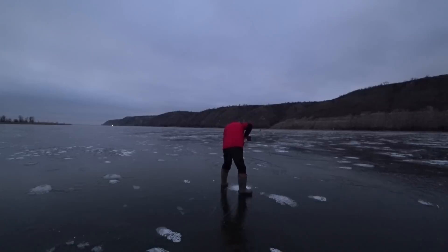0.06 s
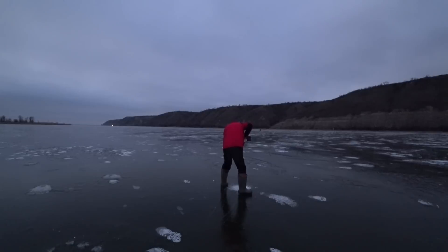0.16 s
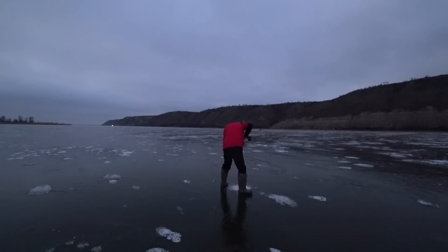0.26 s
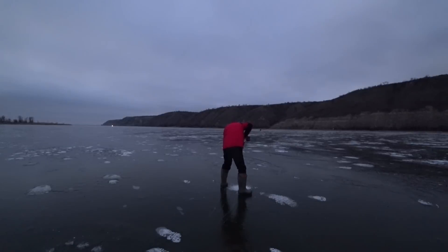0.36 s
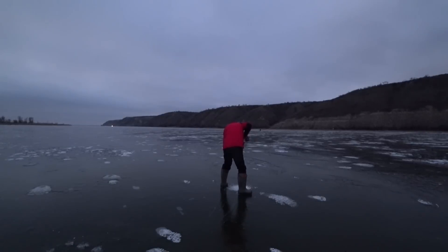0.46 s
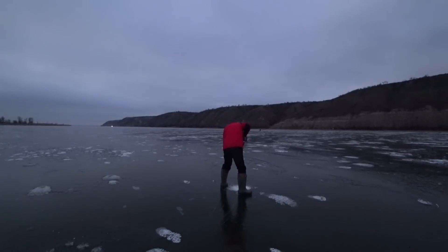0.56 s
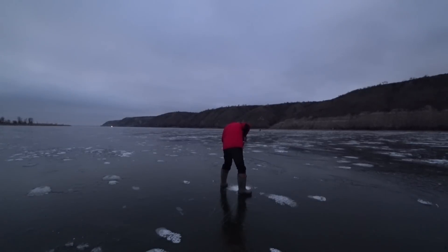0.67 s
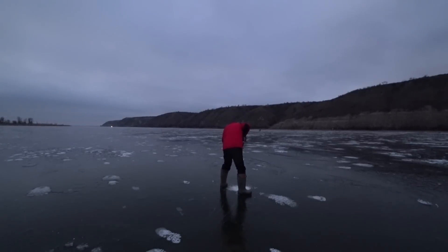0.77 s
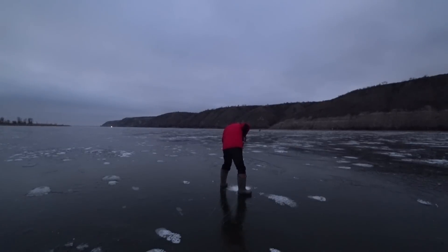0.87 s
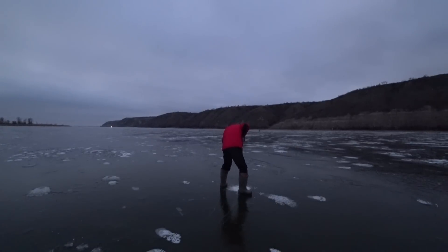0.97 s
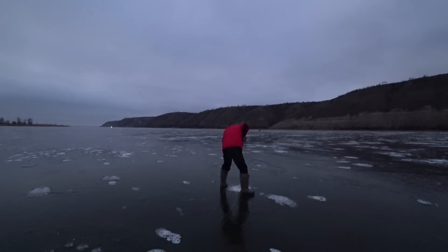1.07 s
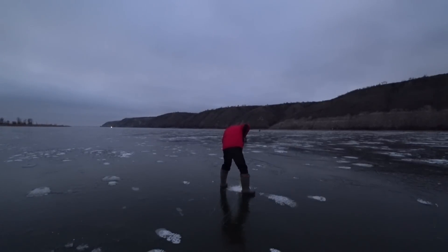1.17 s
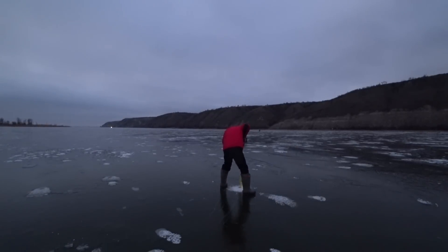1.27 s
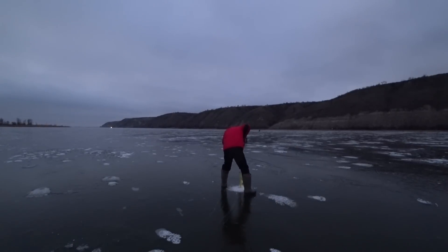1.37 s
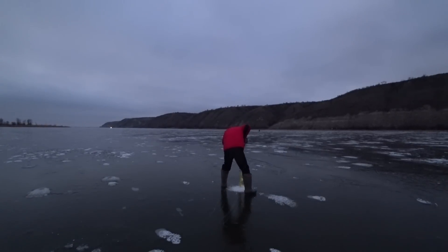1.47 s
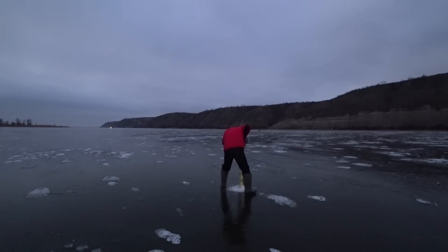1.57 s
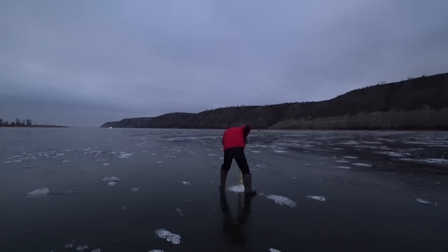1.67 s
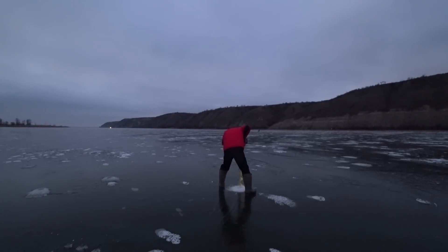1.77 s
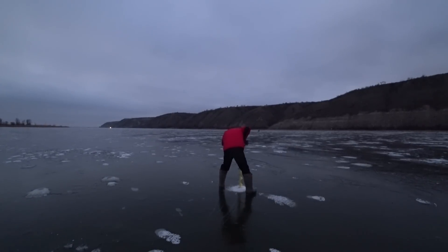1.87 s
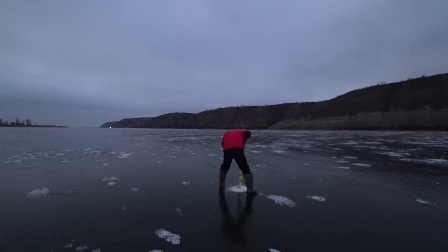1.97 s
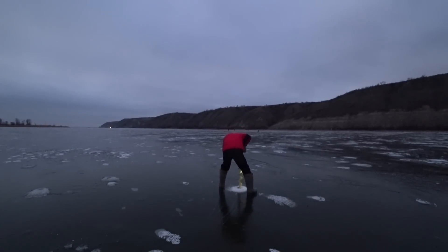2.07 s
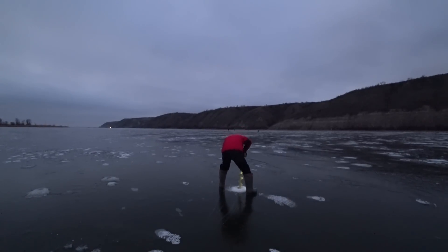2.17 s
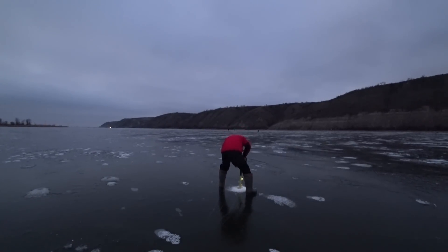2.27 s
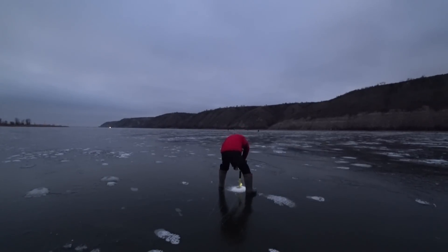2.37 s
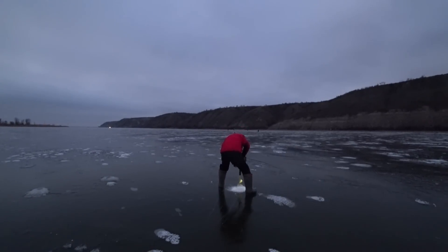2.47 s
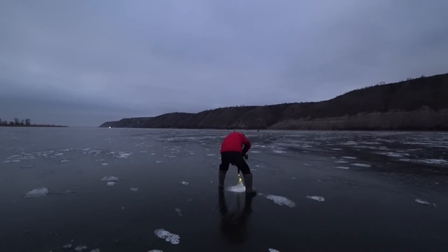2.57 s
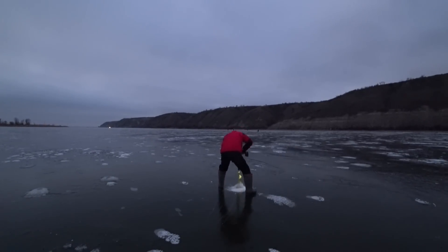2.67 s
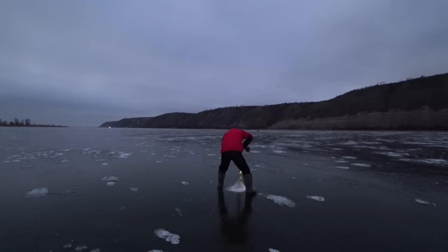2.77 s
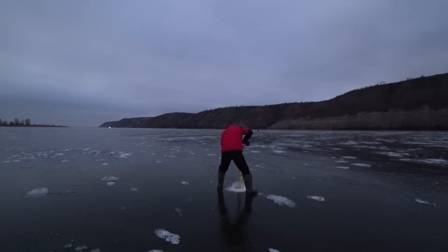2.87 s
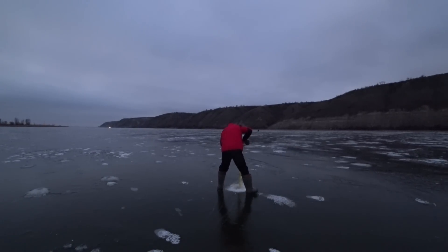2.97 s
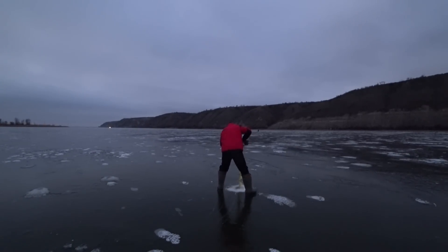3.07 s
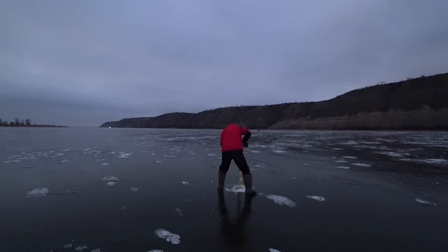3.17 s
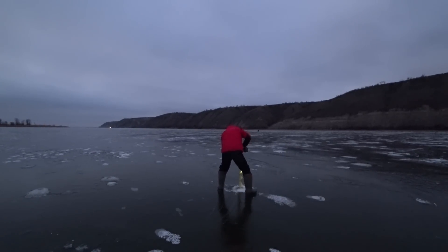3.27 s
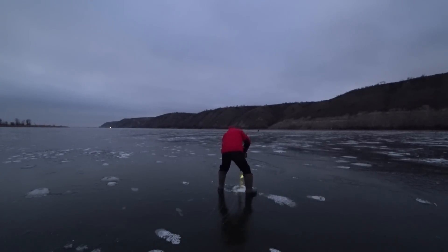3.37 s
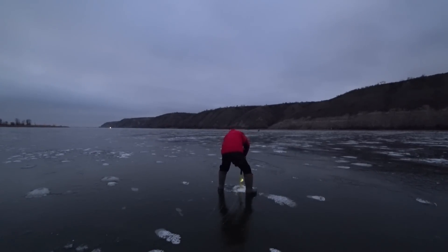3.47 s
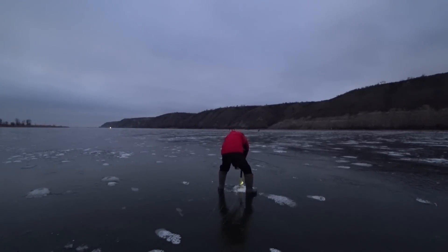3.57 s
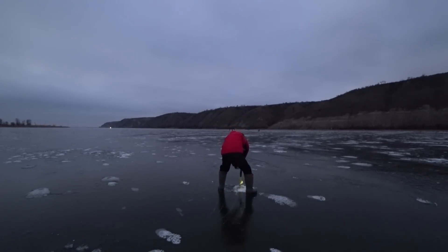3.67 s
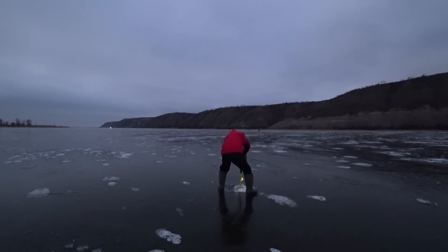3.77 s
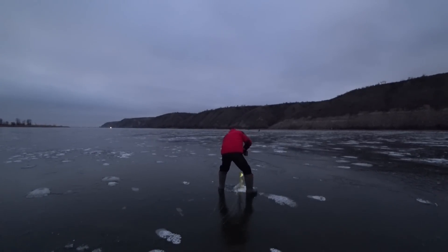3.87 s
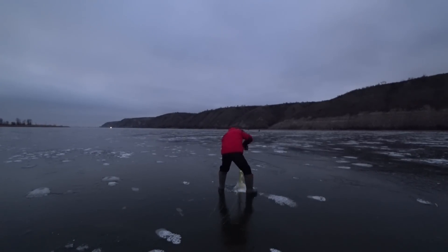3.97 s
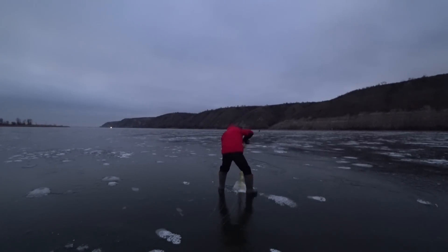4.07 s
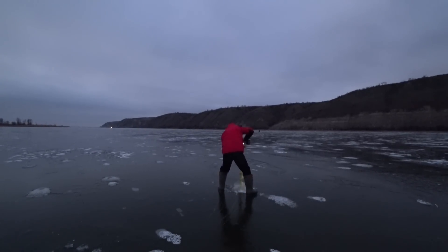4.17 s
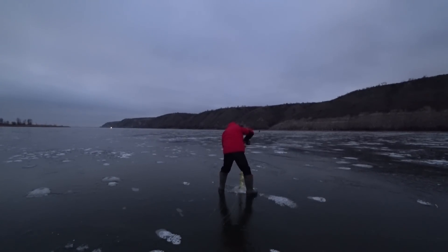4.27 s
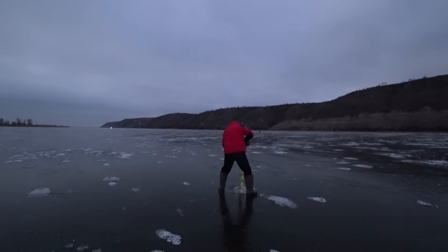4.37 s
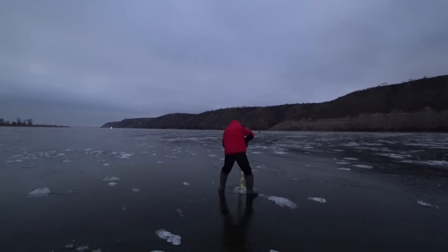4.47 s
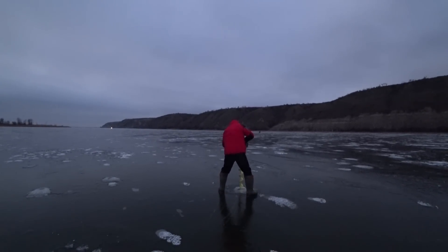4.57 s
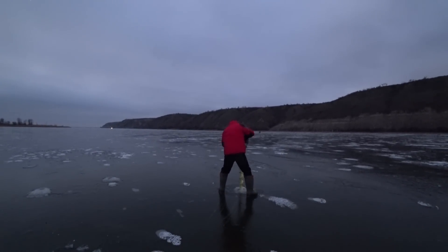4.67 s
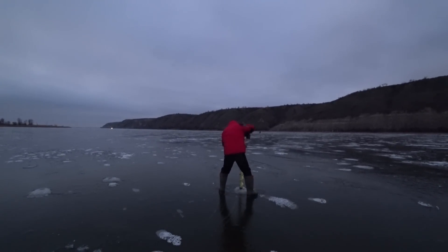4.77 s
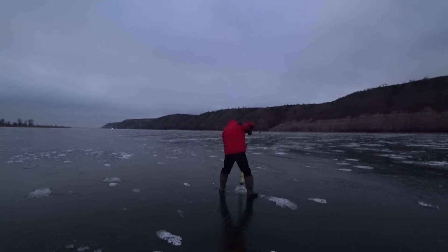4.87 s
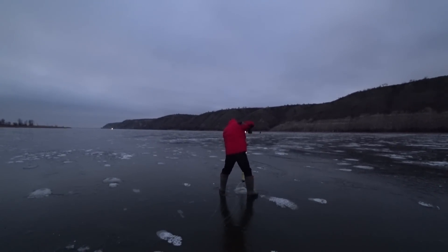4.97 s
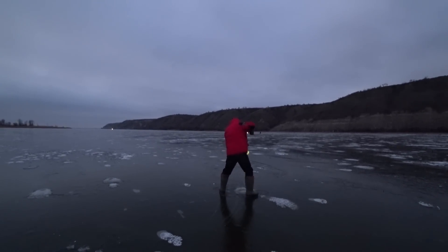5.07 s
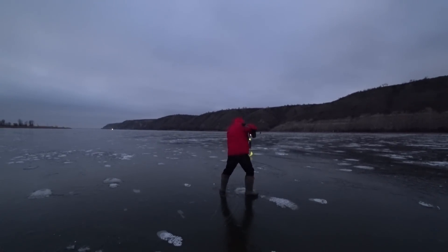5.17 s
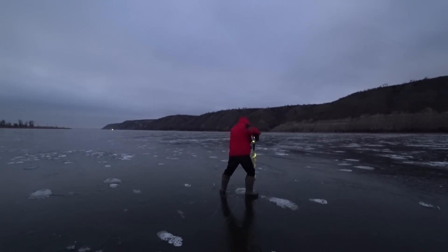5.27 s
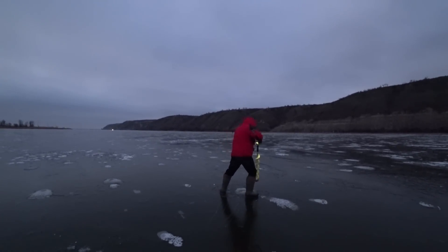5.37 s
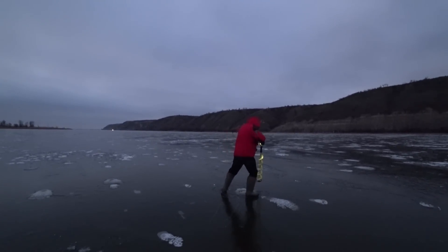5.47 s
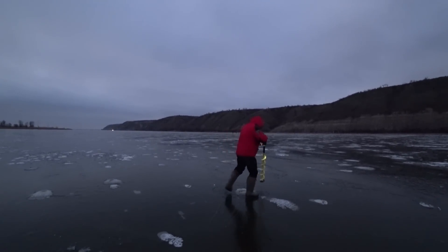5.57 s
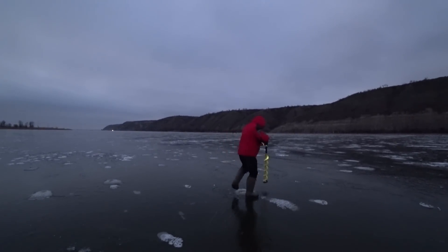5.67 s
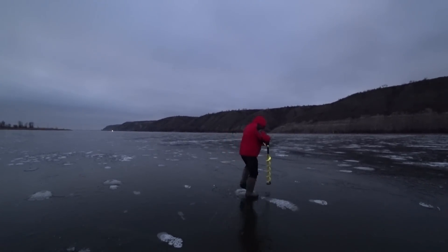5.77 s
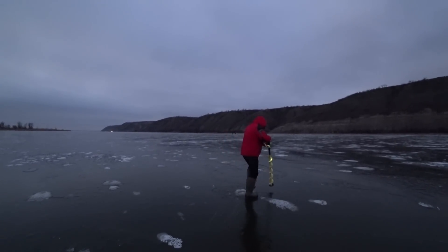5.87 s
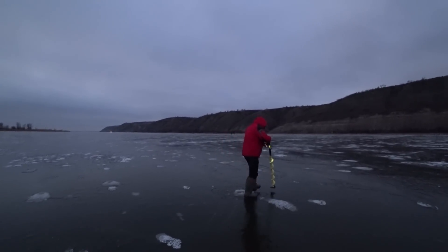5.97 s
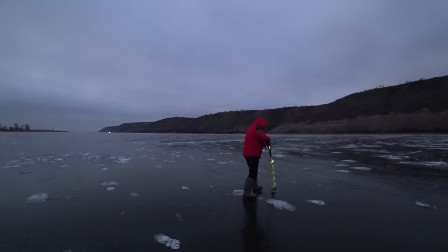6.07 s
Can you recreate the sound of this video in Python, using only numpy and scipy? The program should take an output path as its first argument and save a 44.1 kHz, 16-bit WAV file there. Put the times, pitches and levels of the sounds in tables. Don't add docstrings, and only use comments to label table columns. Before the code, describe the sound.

Outdoors on a frozen river, steel blades shave ice with a singing rasp, break into loud crunches and hollow knocks, then quiet to small wet ticks.

```python
import sys
import numpy as np
from scipy import signal
from scipy.fft import rfft, irfft, next_fast_len
from scipy.io import wavfile
from scipy.ndimage import uniform_filter1d

SR = 44100
rng = np.random.default_rng(int(sys.argv[2]) if len(sys.argv) > 2 else 0)


def how_loud(loudness_db):
    steps = np.asarray(loudness_db, float) / 20
    return 10 ** steps


def master_out(mix):
    frames = np.transpose(np.atleast_2d(mix))
    ceiling = np.clip(frames, -1, 1)
    pcm = np.round(ceiling * 32767).astype(np.int16)
    wavfile.write(sys.argv[1], SR, pcm)


N = 270323

# pitch_hz, level_db [dB per Hz]
SPLINTER_SPECTRUM = [(4120, -6), (7000, -5), (7770, -3.5), (9260, -10.5), (11200, -9.5), (13900, -19),
                     (16000, -26)]


def evened(x):
    return x / np.sqrt(np.mean(x ** 2) + 1e-20)


def read(points, hz):
    point_hz, value = np.transpose(points)
    return np.interp(np.log(hz + 1), np.log(point_hz + 1), value)


def shaped(x, points):
    size = next_fast_len(N)
    gain = how_loud(read(points, np.fft.rfftfreq(size, 1 / SR)))
    return irfft(rfft(x, size) * gain, size)[:N]


def colour(x, points):
    below, above = (points[0][0] * .8, -70), (points[-1][0] * 1.2, -70)
    return evened(shaped(x, [below, *points, above]))


def add(mix, start_s, sound):
    part = mix[round(start_s * SR):][:len(sound)]
    part += sound[:len(part)]


def resonate(x, hz, width_hz):
    turn = np.exp(2j * np.pi * np.cumsum(hz * np.ones(len(x))) / SR)
    decay = np.exp(-np.pi * width_hz / SR)
    smooth = signal.lfilter([1 - decay], [1, -decay], x / turn + 1e-18)
    return 2 * (turn * smooth).real


def grit(per_s, spread_db, flutter_db):
    size = how_loud(spread_db * np.minimum(rng.exponential(1, N), 4)) * rng.choice([-1., 1.], N)
    flutter = uniform_filter1d(rng.standard_normal(N), size=90)
    flutter = evened(signal.lfilter([1], [1, -.994], flutter))
    cracks = rng.random(N) < per_s / SR
    return evened(size * cracks * how_loud(flutter_db * flutter))


def wander(per_s):
    steps = rng.standard_normal(int(N / SR * per_s) + 2)
    return evened(np.interp(np.arange(N) * per_s / SR, np.arange(len(steps)), steps))


def patchy(x, patch_db):
    z = signal.stft(x, nperseg=256)[2]
    patches = uniform_filter1d(rng.standard_normal(z.shape), size=4, axis=0)
    patches = evened(uniform_filter1d(patches, size=9, axis=1))
    return evened(signal.istft(z * how_loud(patch_db * patches), nperseg=256)[1][:N])


def hush():
    # pitch_hz, level_db [dB per Hz]
    hush_spectrum = [(15, -55), (25, -25), (134, -2), (277, 5), (489, 4.5), (754, 2), (988, 8), (2220, -1),
                     (2910, -6), (3250, -9), (6920, -1.5), (9320, -17), (12200, -13.5), (14800, -21),
                     (16000, -13)]
    # pitch_hz, likeness [-1 to 1]
    likeness = [(60, 1), (300, 0.86), (1650, 0.029), (5000, 0.12), (15000, 0.51)]
    frames, hz = N // 256 + 5, np.fft.rfftfreq(1024, 1 / SR)
    a, b, c, d, patches = rng.standard_normal((frames, 513, 5)).T
    patches = uniform_filter1d(patches, size=12, axis=0)
    patches = 1.5 * evened(uniform_filter1d(patches, size=14, axis=1))
    same = np.clip(read(likeness, hz), -1, 1)[:, None]
    left = a + 1j * b
    right = same * left + np.sqrt(1 - same ** 2) * (c + 1j * d)
    z = np.array([left, right]) * how_loud(read(hush_spectrum, hz)[:, None] + patches)
    return how_loud(-54.5) * evened(signal.istft(z, nperseg=1024, noverlap=768)[1][:, :N])


def whine():
    # pitch_hz, level_db
    tones = [(9920, -82), (12350, -85)]
    out = np.zeros(N)
    for hz, db in tones:
        out += how_loud(db) * evened(resonate(resonate(rng.standard_normal(N), hz, 90), hz, 90))
    return out


def rubbing(t):
    # start_s, end_s, shaving_db, hole_ring_db, fizz_db
    strokes = [(.0, 0.027, -32, -57, -35), (0.036, 0.064, -23.5, -42, -40.5), (0.221, .26, -46, -43, -70),
               (0.27, 0.418, -29, -39.5, -45), (0.43, 0.47, -35.5, -39, -50),
               (0.485, 0.644, -46.5, -44.5, -72), (.65, 0.916, -51, -59, -78),
               (0.712, 0.836, -43.5, -61, -77), (1.068, 1.095, -31, -44, -42),
               (1.103, 1.822, -23, -41, -39), (1.83, 1.976, -22.5, -41.5, -35.5),
               (2.01, 2.058, -35.5, -47.5, -48), (2.06, 2.46, -43, -55.5, -50),
               (2.508, 2.846, -42.5, -44, -47), (2.888, 2.994, -32, -35, -56), (3, 3.179, -35.5, -49, -48),
               (3.211, 3.4, -40, -46.5, -52), (3.41, 3.556, -42.5, -44, -66),
               (3.57, 3.646, -36.5, -47.5, -47), (3.668, 3.84, -45, -48.5, -51),
               (3.835, 4.07, -39, -39.5, -50), (4.1, 4.404, -40.5, -55, -52),
               (4.431, 4.491, -42.5, -50.5, -60), (4.672, 4.829, -38.5, -38.5, -55)]
    # time_s, level_db
    slush = [
        (0, -58),
        (4.8, -53),
        (5.2, -53),
        (5.35, -58.5),
        (6.13, -68),
    ]
    rise_db_per_s, fall_db_per_s = 605, 545
    slush_layers_db = np.array([[0], [-8], [-8]])
    power = how_loud(np.interp(t, *np.transpose(slush)) + slush_layers_db) ** 2
    for start, end, *layers_db in strokes:
        near = slice(max(round((start - .1) * SR), 0), round((end + .1) * SR))
        rise_db = rise_db_per_s * (t[near] - start)
        fall_db = fall_db_per_s * (end - t[near])
        edge_db = np.minimum(0, np.minimum(rise_db, fall_db))
        stroke = how_loud(edge_db + np.array(layers_db)[:, None]) ** 2
        power[:, near] = np.maximum(power[:, near], stroke)
    return np.sqrt(power)


def shaving():
    # pitch_hz, width_hz, level_db
    shaft_modes = [(900, 90, 2), (2020, 60, -5), (2320, 70, -6), (5520, 120, -7)]
    # pitch_hz, swing_hz with each bite, sag [Hz per s], width_hz, level_db
    loaded_modes = [(1580, 20, -90, 45, 0), (2930, -60, -100, 90, 0), (4200, 50, 0, 90, -9),
                    (3260, 100, 0, 30, 1), (2450, 60, -150, 45, -2), (3650, -80, -120, 45, -3),
                    (5750, 90, 100, 120, -6)]
    # time_s, pitch_hz, level_db
    song = [(1.2, 4800, -8), (1.32, 4520, 5), (1.37, 4560, 5), (1.43, 4780, 4), (1.56, 4620, 2),
            (1.64, 4900, -7), (1.74, 4780, 1), (1.84, 4560, 0), (1.95, 4500, -10)]
    # pitch_hz, level_db [dB per Hz]
    ice_spectrum = [(440, -34), (750, -75), (904, 1.5), (1270, 2), (1600, 0), (2930, -1.5), (3530, -2),
                    (5700, -3), (9000, -22.5), (11700, -42), (19800, -120)]
    # pitch_hz, level_db [dB per Hz]
    hollow_spectrum = [(300, -8), (450, 4.5), (600, 6), (800, 11), (950, 3)]
    # pitch_hz, level_db [dB per Hz]
    thud_spectrum = [(71, -53), (120, -12), (249, -5.5), (361, -26), (420, -5), (550, -3), (920, -120)]
    cut_start_s, cut_end_s, free_s = 1.04, 2.03, 1.83
    bites_per_s, bite_s, bend_lag_s = 4.15, 1.413, .045
    t = np.arange(N) / SR
    shave, ring, fizz = rubbing(t)
    bite = np.cos(2 * np.pi * bites_per_s * (t - bite_s))
    load = uniform_filter1d(1. * (t > cut_start_s) * (t < cut_end_s), size=900)
    bend = np.cos(2 * np.pi * bites_per_s * (t - bite_s - bend_lag_s))
    bend *= np.clip((cut_end_s - t) / .35, 0, 1)
    drive = grit(14000, spread_db=1.5, flutter_db=1.3)

    age = np.clip(t, cut_start_s, cut_end_s) - (cut_start_s + cut_end_s) / 2
    modes = list(shaft_modes)
    for hz, swing, sag, width, db in loaded_modes:
        modes.append((hz + swing * bend + sag * age, width, db))
    steel = np.zeros(N)
    for hz, width, db in modes:
        mode = evened(resonate(drive, hz * (1 + .004 * wander(14)), width))
        steel += how_loud(db + 1.5 * wander(25)) * mode
    song_s, song_hz, song_db = np.transpose(song)
    singing = evened(resonate(drive, np.interp(t, song_s, song_hz), 24))
    steel += how_loud(3 + np.interp(t, song_s, song_db)) * singing
    steel = evened(shaped(steel, [(6500, 0), (12000, -20)]))
    steel_db = -4 - 9 * (1 - load)
    body = patchy(colour(drive, ice_spectrum), patch_db=1.4) + how_loud(steel_db) * steel

    filled = evened(resonate(resonate(drive, 579, 35), 496, 155))
    hole = load * filled + (1 - load) * patchy(colour(drive, hollow_spectrum), patch_db=4.0)
    low = hole + how_loud(-17.0) * colour(drive, thud_spectrum)

    splinters = colour(grit(2500, spread_db=-2.5, flutter_db=1.6), SPLINTER_SPECTRUM)
    muffled = shaped(splinters, [(9000, 1), (11000, 1.5), (16000, -7)])
    splinters = np.where((load > .5) & (t < free_s), muffled, splinters)
    shave = shave * how_loud(-3.0 + 1 * bite * load)
    return shave * body + ring * low + fizz * splinters


def jolts():
    # start_s, peak_db, pitch_hz
    jolt_hits = [(0.0, -63, 149), (0.131, -45.5, 303), (0.251, -41.5, 300), (1.53, -66, 50),
                 (1.931, -54, 286), (2.549, -53, 155), (2.61, -56, 90), (2.815, -44, 245),
                 (2.964, -43.5, 250), (3.12, -54, 217), (3.41, -61, 111), (3.5, -54, 203),
                 (3.81, -45.5, 230), (5.04, -61, 152), (5.15, -66, 101), (5.34, -61, 200)]
    out, t = np.zeros(N), np.arange(4000) / SR
    for s, db, hz in jolt_hits:
        swell = t / .012 * np.exp(1 - t / 0.011)
        add(out, s, how_loud(db) * swell * np.sin(2 * np.pi * hz * t))
    return out


def squeals():
    # start_s, end_s, from_hz, to_hz, level_db
    squeal_list = [(.025, .078, 5400, 4400, -39), (.305, .352, 4250, 4950, -44),
                   (.355, .38, 5150, 5450, -42), (.008, .036, 6400, 5600, -44),
                   (.37, .415, 5480, 5450, -47), (.412, .436, 5350, 4050, -42.5),
                   (.035, .072, 3500, 3150, -39), (.3, .335, 6250, 6850, -54),
                   (3.08, 3.14, 1500, 1500, -45), (.275, .33, 2620, 3250, -43),
                   (.335, .366, 3300, 3600, -45), (.82, .95, 740, 900, -60), (.75, .88, 1410, 1530, -55),
                   (.85, .97, 860, 1010, -63), (.715, .77, 920, 870, -58), (2.12, 2.41, 5330, 5620, -55.5),
                   (2.12, 2.41, 4430, 4565, -59), (2.12, 2.41, 2665, 2810, -59),
                   (2.13, 2.36, 1340, 1410, -59), (1.995, 2.06, 3750, 4850, -51),
                   (2.14, 2.3, 3800, 4000, -62), (4.272, 4.296, 1200, 1500, -49),
                   (4.357, 4.376, 950, 1380, -50), (4.378, 4.39, 1050, 1400, -51),
                   (1.04, 1.09, 2900, 3500, -47), (1.33, 1.42, 3300, 3150, -41),
                   (1.64, 1.74, 2900, 3050, -41), (1.12, 1.27, 1640, 1560, -42),
                   (1.17, 1.22, 5600, 5500, -43), (1.68, 1.76, 1450, 1560, -42),
                   (1.91, 1.96, 4300, 4200, -41), (1.68, 1.75, 5300, 6100, -46),
                   (4.04, 4.085, 4300, 3900, -49)]
    out = np.zeros(N)
    for start, end, from_hz, to_hz, db in squeal_list:
        t = np.arange(start, end, 1 / SR)
        glide = 1 - np.linspace(1, 0, len(t)) ** 1.6
        arch = np.sin(np.linspace(0, np.pi, len(t)))
        ragged = evened(uniform_filter1d(rng.standard_normal((2, len(t))), size=300))
        wobble_hz, swell_db = 12 * ragged[0], 3.2 * ragged[1]
        hz = from_hz + (to_hz - from_hz) * glide
        tone = np.sin(2 * np.pi * np.cumsum(hz + wobble_hz) / SR)
        rasp = resonate(rng.standard_normal(len(t)), hz, .012 * from_hz)
        tone += 0.16 * evened(rasp)
        loudness = how_loud(db + 6.5 + 1.0 * arch + swell_db)
        add(out, start, loudness * tone * signal.windows.tukey(len(t), .15))
    return out


def knocks():
    # start_s, peak_db, pitch_hz
    bumps = [(0.142, -33.5, 554), (0.345, -41, 920), (0.402, -22.5, 964), (0.521, -25.5, 1050),
             (1.101, -17.5, 966), (2.463, -27, 947), (2.515, -17, 928), (2.559, -24.5, 780),
             (2.582, -20.5, 930), (2.61, -21, 1004), (2.726, -25, 966), (2.889, -16.5, 916),
             (2.926, -18, 506), (3.248, -26, 778), (3.253, -22.5, 574), (3.821, -18.5, 520),
             (3.825, -16.5, 790), (4.108, -34, 396), (4.178, -21, 445), (4.709, -18, 750),
             (4.713, -17, 865), (4.727, -12, 798), (4.745, -16, 796), (4.032, -21, 920),
             (4.819, -23.5, 452), (4.786, -9.5, 502), (3.358, -27, 480), (2.72, -23.5, 446),
             (2.975, -24.5, 403), (2.575, -30, 404), (3.39, -31, 433), (3.93, -35, 400), (3.878, -26, 536),
             (4.058, -29, 760), (0.03, -26.5, 1012), (0.06, -22.5, 1007), (0.287, -26, 973),
             (2.827, -10, 700), (3.555, -27, 544), (3.59, -34, 926), (4.465, -32, 493), (4.437, -34.5, 580),
             (4.36, -42, 1020), (4.196, -26, 760), (4.193, -27, 450), (4.205, -30, 450), (4.222, -36, 480),
             (4.11, -30, 760), (4.166, -20, 800), (4.46, -36, 850), (4.26, -39, 520), (4.303, -39, 560),
             (2.838, -18, 520), (2.864, -28, 480), (3.863, -30, 1000)]
    # start_s, peak_db, pitch_hz
    booms = [(0.264, -21, 946), (0.443, -27, 925), (0.464, -29, 362), (0.612, -29.5, 910),
             (2.513, -24, 965), (2.812, -21, 1020), (2.832, -14.5, 509), (3.308, -27, 986),
             (3.34, -26.5, 511), (3.395, -25, 720), (3.523, -19, 483), (3.705, -37, 454),
             (3.974, -28.5, 580), (4.155, -17, 734), (4.152, -22.5, 464), (4.802, -21, 500)]
    out, t = np.zeros(N), np.arange(3300) / SR
    for hits, t60_s in ((bumps, 0.026), (booms, 0.071)):
        for s, db, hz in hits:
            blow = np.sin(2 * np.pi * hz * t) + 2.5 * rng.standard_normal(len(t))
            blow *= t * np.exp(-t / 0.0018)
            other_hz = hz * (.58 if hz > 650 else 1.7)
            parts = ((hz, 2.04 / t60_s, -3.0), (other_hz, 60, -13), (380, 120, -34), (1400, 600, -13))
            knock = np.zeros(len(t))
            for part_hz, width, part_db in parts:
                part = resonate(resonate(blow, part_hz, width), part_hz, 495)
                knock += how_loud(db + part_db) * part / abs(part).max()
            add(out, s - .002, knock)
    return out


def crunches():
    # pitch_hz, level_db [dB per Hz]
    break_spectrum = [(500, -7), (850, -0.5), (1100, 2), (1550, -0.5), (1820, -0.5), (2750, 1),
                      (3740, -0.5), (5660, -1), (9000, -15.5), (11700, -48), (19800, -120)]
    # start_s, peak_db, chunk_ring_hz, length_ms
    crisp_hits = [(2.0408, -20, 2050, 5.1), (2.5011, -23, 1250, 21), (2.556, -13, 1270, 5),
                  (2.566, -20, 3000, 9), (2.578, -11.5, 1260, 10.4), (2.6678, -14.5, 3580, 5.6),
                  (2.8085, -12, 3100, 17), (2.8528, -5.5, 2130, 8.1), (2.8865, -6, 2250, 8.9),
                  (2.9186, -9, 2900, 14), (2.974, -12, 1510, 12), (3.2504, -18, 1780, 11),
                  (3.2933, -18.5, 2150, 15), (3.334, -12, 6200, 9), (3.411, -13, 2120, 12),
                  (3.457, -16.5, 2430, 12), (3.4915, -4, 1580, 12.8), (3.82, -10, 2400, 12.3),
                  (3.876, -7, 2540, 7.7), (3.934, -9, 1440, 7.9), (4.03, -5, 2070, 5.6),
                  (4.109, -8, 2200, 6.5), (4.1592, -13, 3240, 4.6), (4.1984, -27, 3450, 8.6),
                  (4.3644, -22, 1260, 10), (4.3994, -35.5, 4100, 22), (5.5952, -39, 2780, 20),
                  (2.531, -22, 2970, 3.2), (2.6, -21, 3300, 4.4), (2.996, -7, 3900, 4.1),
                  (3.524, -16, 1720, 10.3), (3.838, -14, 3400, 3.1), (4.373, -24, 5500, 5),
                  (3.9, -35, 3000, 5), (2.173, -28, 6200, 6.9), (0.365, -24, 5400, 6.8),
                  (0.403, -25, 2000, 5)]
    # start_s, peak_db, chunk_ring_hz, length_ms
    packed_hits = [(0.1406, -31.5, 1820, 6), (1.0395, -23, 3080, 21), (2.4283, -20, 3560, 27),
                   (2.465, -25.5, 2900, 18), (2.5151, -12.5, 1270, 10.6), (2.6109, -14, 1510, 2.6),
                   (2.6957, -15.5, 1780, 4.1), (2.826, -9, 1450, 11.7), (2.9546, -10, 2130, 13.4),
                   (3.3682, -12, 3100, 13), (3.424, -10, 2660, 11.6), (3.513, -12, 1600, 11),
                   (3.545, -15, 2260, 8.4), (3.8067, -23, 1440, 5.4), (4.1419, -15, 2500, 40),
                   (4.2794, -25, 1310, 6), (4.6588, -25, 1290, 32), (4.771, -22, 2140, 14),
                   (4.79, -16.5, 2180, 12), (5.5643, -37.5, 4200, 30), (5.6294, -40, 2160, 20),
                   (3.552, -11, 2230, 8.8), (2.649, -29, 1100, 6), (2.758, -15.5, 1610, 15),
                   (2.796, -25, 1190, 3.5), (3.235, -29, 1420, 6.3), (3.268, -27, 1700, 5.9),
                   (3.76, -24, 1930, 13), (4.052, -24, 4130, 16), (3.728, -36, 1100, 8),
                   (0.2537, -22, 2870, 9.9)]
    # start_s, peak_db, chunk_ring_hz, length_ms
    wet_hits = [(0.2658, -17.5, 1200, 41), (0.5796, -22.5, 1610, 17), (0.604, -21, 1940, 20),
                (0.7492, -19, 1400, 21), (0.8031, -20, 4100, 19), (1.0964, -9, 1140, 9.3),
                (2.724, -8, 3500, 6), (3.0994, -17, 1600, 15), (4.4794, -29, 2400, 10),
                (4.711, -12, 2140, 16), (4.7444, -27, 1340, 50)]
    # start_s, peak_db, chunk_ring_hz, length_ms
    crushed_hits = [(3.975, -1.5, 2860, 6.5), (4.008, -5, 2050, 7), (3.382, -3.5, 2050, 9),
                    (3.858, -15, 1100, 10), (2.744, -9, 1500, 12), (4.693, -17, 1220, 12),
                    (3.77, -17, 2840, 8), (3.74, -20, 1100, 8), (2.968, -13, 1500, 12),
                    (2.526, -16, 2900, 8)]
    drive = grit(12000, spread_db=1.5, flutter_db=1.6)
    body = patchy(colour(drive, break_spectrum), patch_db=4.5)
    fizz = colour(grit(3000, spread_db=-2.5, flutter_db=2.5), SPLINTER_SPECTRUM)
    body = evened(body / np.sqrt(uniform_filter1d(body ** 2, size=350) + .05))
    dull = signal.sosfiltfilt(signal.butter(2, 2800, fs=SR, output="sos"), body)
    out, t = np.zeros(N), np.arange(4000) / SR
    # hits, fizz dB re peak, rise re length
    kinds = ((crisp_hits, -4, .23), (packed_hits, -13, .23), (wet_hits, -40, .23), (crushed_hits, -6, .9))
    for hits, fizz_db, rise in kinds:
        crisp = how_loud(0.3 * min(fizz_db + 4.5, 0))
        ice = dull + crisp * (body - dull) + how_loud(fizz_db) * fizz
        for s, db, hz, ms in hits:
            at, age = round(s * SR), t * 1000 / max(ms, 2)
            onset = 1 - np.exp(-(age / rise) ** (0.55 + rise))
            fade = np.exp(-age ** 1.35) + 0.045 * np.exp(-t / 0.05)
            ring = evened(resonate(drive[at:at + len(t)], hz, 130))
            burst = ice[at:at + len(t)] + how_loud(-6.0) * ring
            add(out, s, how_loud(db - 11.0) * onset * fade * burst)
    return out


def chips():
    # start_s, peak_db, pitch_hz
    landings = [(0.183, -39.5, 3260), (0.2033, -35, 5760), (4.2076, -20, 3560), (4.517, -29, 3160),
                (4.5376, -33, 3930), (4.9765, -32.5, 2800), (5.011, -33.5, 4190), (5.054, -38, 2570),
                (5.086, -31.5, 3370), (5.135, -37, 4700), (5.1596, -34.5, 4570), (5.2086, -33, 3370),
                (5.3363, -47, 4920), (5.3866, -36.5, 3970), (5.415, -33.5, 2680), (5.5035, -44, 2530),
                (5.595, -28.5, 2800), (5.6731, -40, 6500), (5.735, -35.5, 3820), (5.762, -34, 5200),
                (5.8563, -41, 2940), (5.932, -42, 5970), (6.0336, -41, 2150), (6.085, -43, 2180),
                (6.106, -36, 6140), (4.955, -43, 3600), (4.986, -40, 3600), (4.982, -43, 6500),
                (5.028, -43, 6200), (5.06, -41, 4200), (5.095, -42, 5500), (5.225, -43, 7800),
                (5.3114, -46, 5810), (5.3533, -45, 3470), (5.395, -46, 9000), (5.52, -52, 13000),
                (5.59, -47, 12500), (5.601, -44, 10500), (5.645, -47, 9200), (5.75, -45, 9000),
                (5.771, -41, 5300), (5.783, -46, 4800), (5.828, -46, 11500), (5.855, -50, 12500),
                (5.865, -42, 2900), (5.9853, -49, 6610), (5.712, -44, 1500), (5.632, -40, 2700),
                (5.612, -38, 2300), (0.994, -42, 6000), (0.915, -42, 2400), (4.485, -36, 2400)]
    out, t = np.zeros(N), np.arange(700) / SR
    for s, db, hz in landings:
        tick = rng.standard_normal(len(t)) * t * np.exp(-t / 0.0013)
        ping = resonate(resonate(tick, hz * (1 + 20 * t), 0.25 * hz), hz, 0.7 * hz)
        add(out, s, how_loud(db - 2.5) * ping / abs(ping).max())
    return out


def scatter(x):
    # pitch_hz, level_db
    scatter_spectrum = [(200, -19), (600, -18.5), (1100, -12.5), (2000, -24), (4500, -22), (8000, -13),
                        (13000, -17)]
    t = np.arange(3000) / SR
    echoes = rng.standard_normal(len(t)) * (rng.random(len(t)) < .1) * (t > .003)
    tail = echoes * how_loud(-60 * t / 0.05)
    wet = signal.fftconvolve(x, tail / np.linalg.norm(tail))[:N]
    return shaped(wet, scatter_spectrum) * np.array([[1], [-1]])


def scene():
    # time_s, left_minus_right_db
    place = [(0.0, -0.5), (0.41, -1.2), (0.61, -7.5), (0.89, -6.5), (0.99, -0.4), (2.97, -0.6), (3.19, -3),
             (3.34, -0.6), (5.7, -1), (6.13, -1.5)]
    auger = shaving() + squeals() + knocks() + crunches() + chips()
    auger = signal.sosfilt(signal.butter(4, 210, "high", fs=SR, output="sos"), auger) + jolts()
    pan_db = np.interp(np.arange(N) / SR, *np.transpose(place))
    return (auger + scatter(auger)) * how_loud([pan_db / 2, -pan_db / 2]) + hush() + whine()


def top_cut(x):
    return signal.sosfilt(signal.butter(12, 16510, fs=SR, output="sos"), x)


def record(dry):
    limited = 1.2 * np.tanh(dry / 1.2)
    mix = signal.oaconvolve(limited, signal.firwin(601, 15750, fs=SR)[None], "same")
    return top_cut(mix)


dry = scene()
out = record(dry)
master_out(out)
```